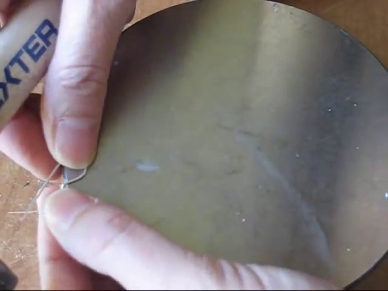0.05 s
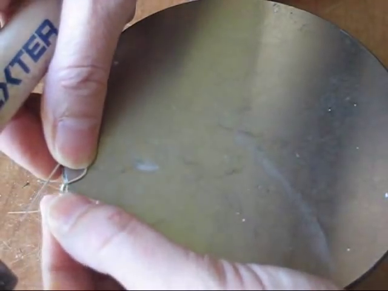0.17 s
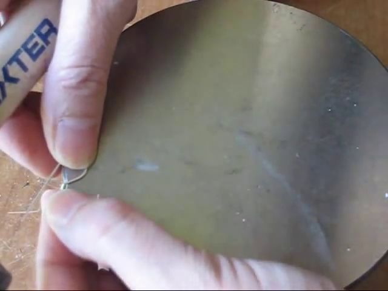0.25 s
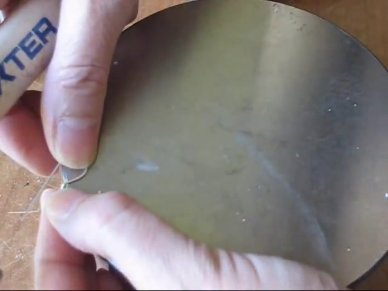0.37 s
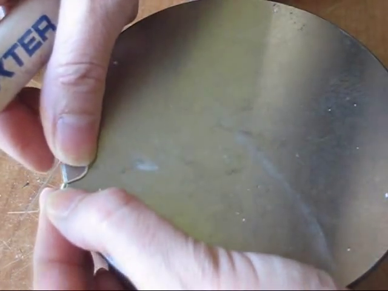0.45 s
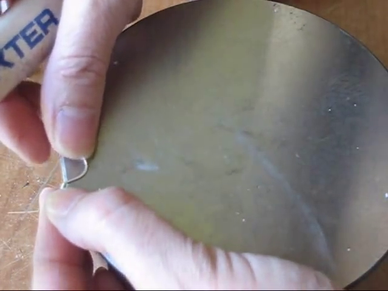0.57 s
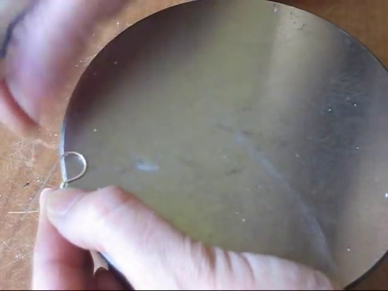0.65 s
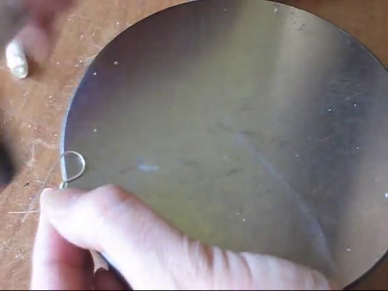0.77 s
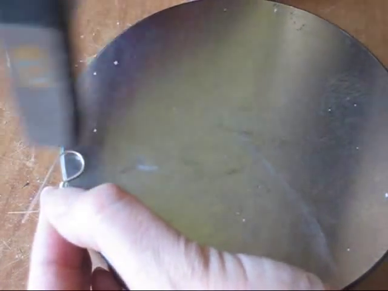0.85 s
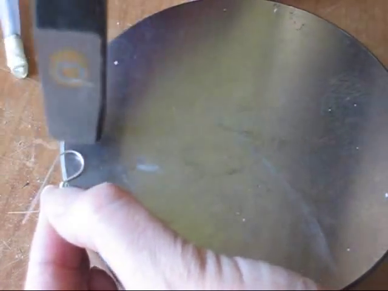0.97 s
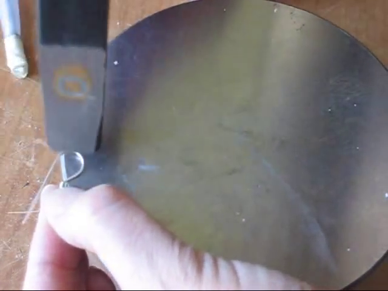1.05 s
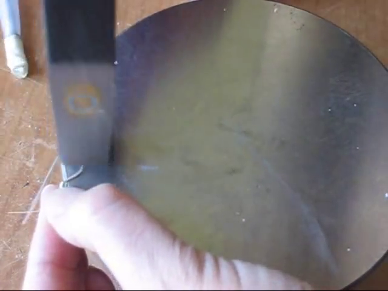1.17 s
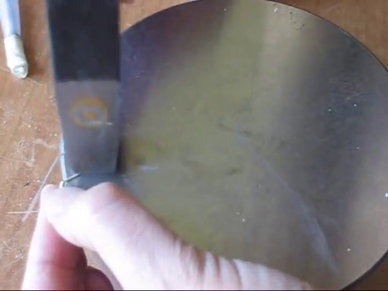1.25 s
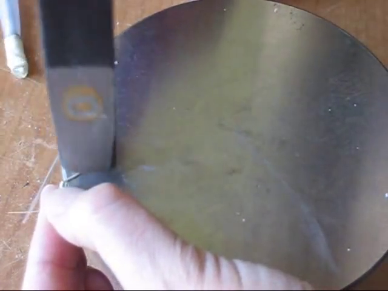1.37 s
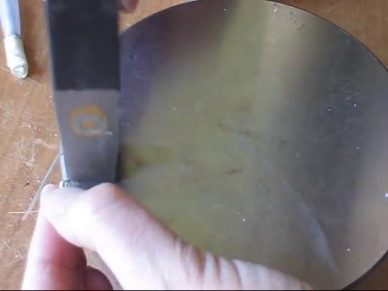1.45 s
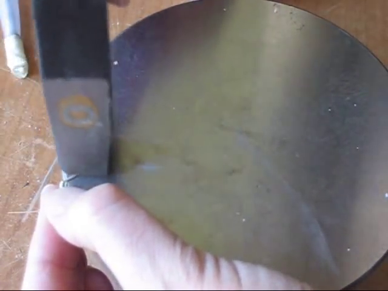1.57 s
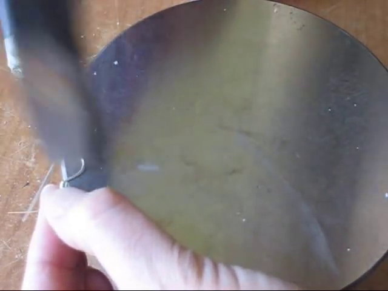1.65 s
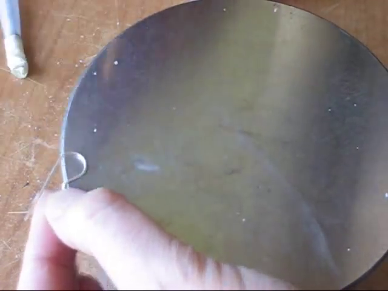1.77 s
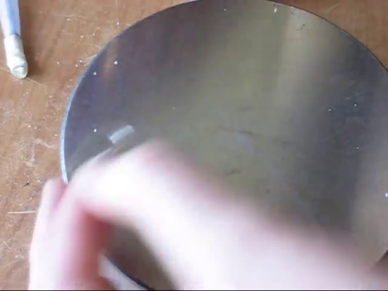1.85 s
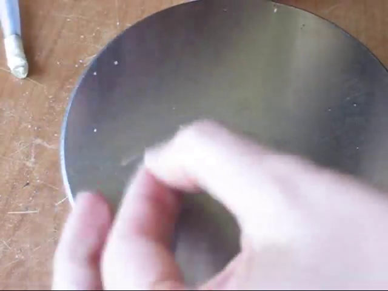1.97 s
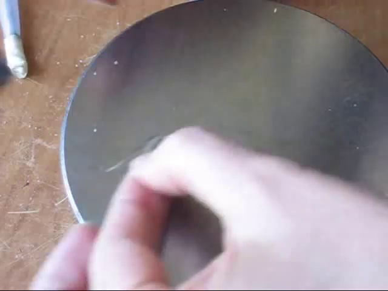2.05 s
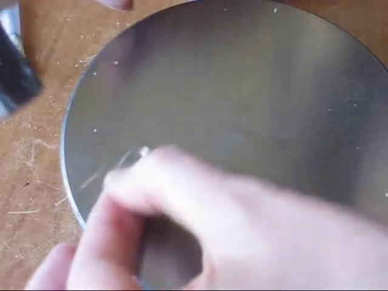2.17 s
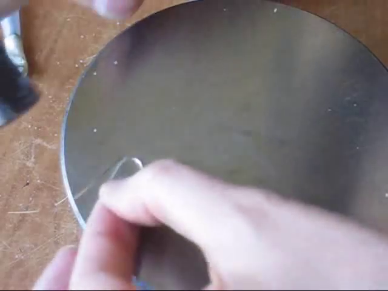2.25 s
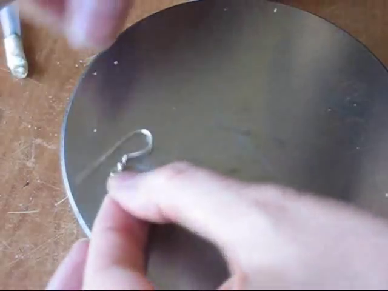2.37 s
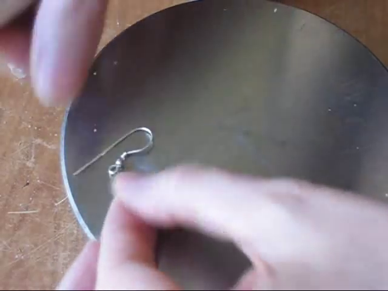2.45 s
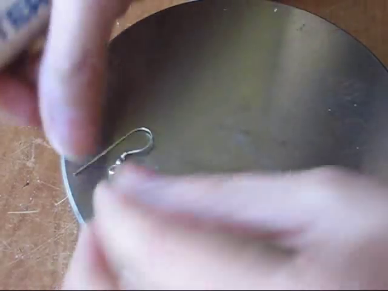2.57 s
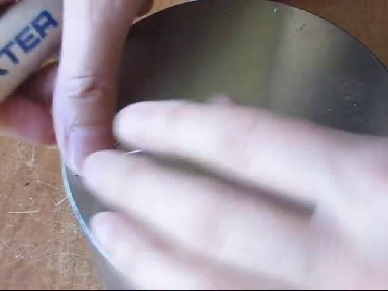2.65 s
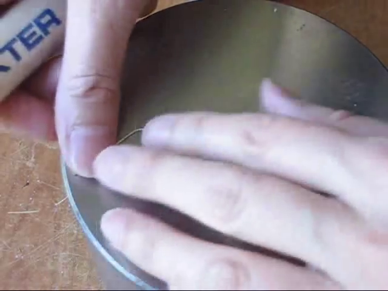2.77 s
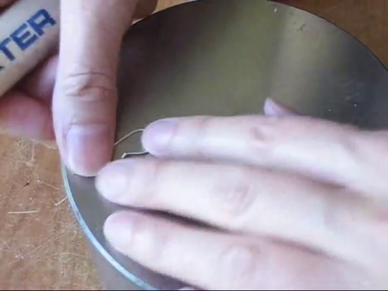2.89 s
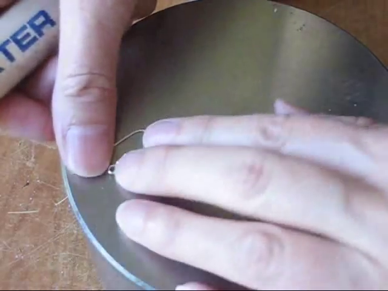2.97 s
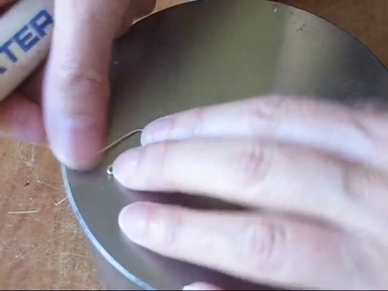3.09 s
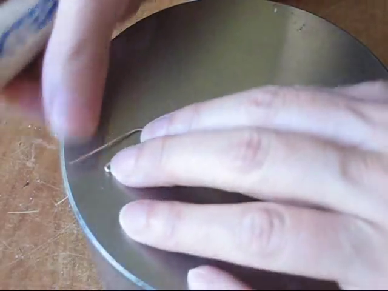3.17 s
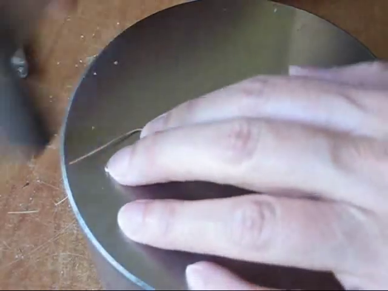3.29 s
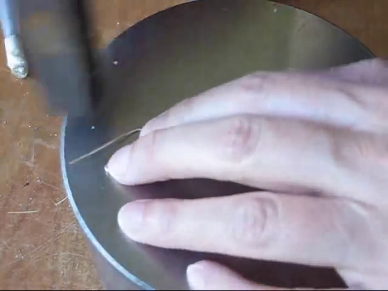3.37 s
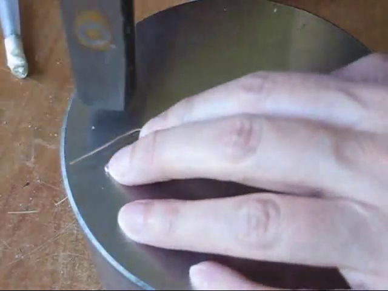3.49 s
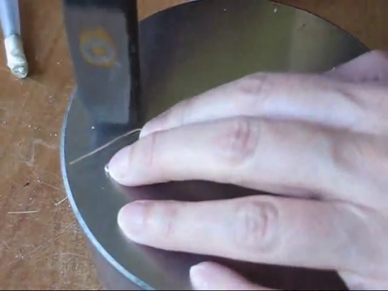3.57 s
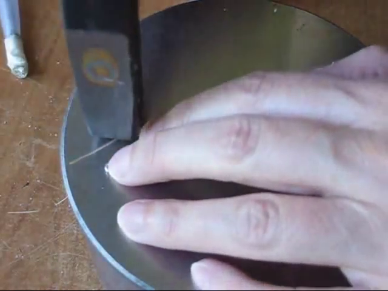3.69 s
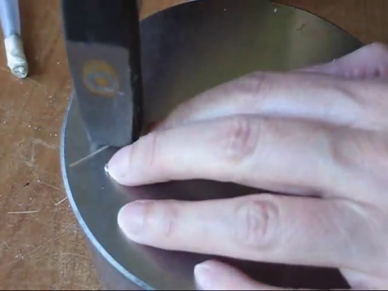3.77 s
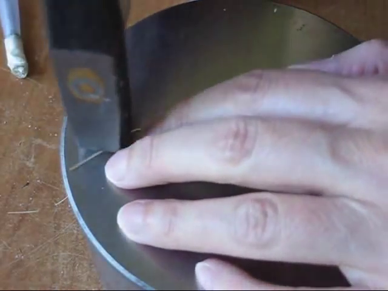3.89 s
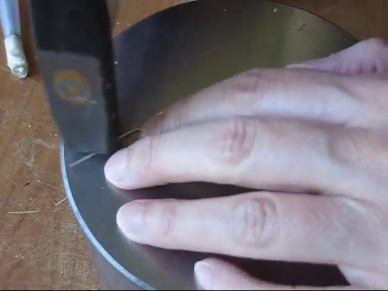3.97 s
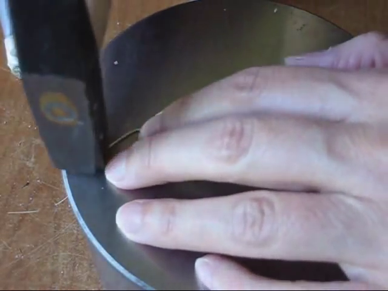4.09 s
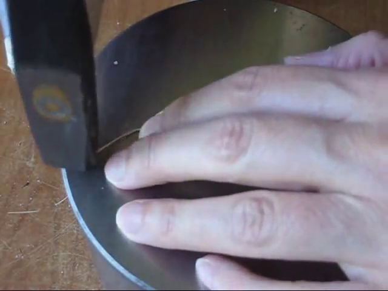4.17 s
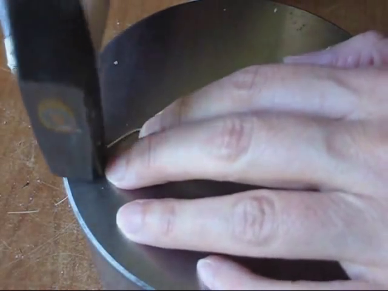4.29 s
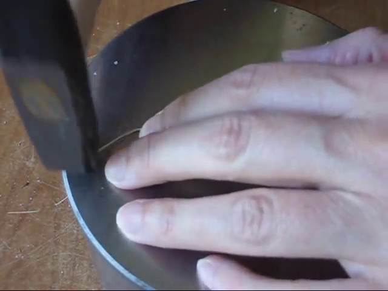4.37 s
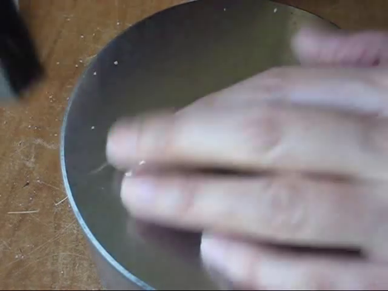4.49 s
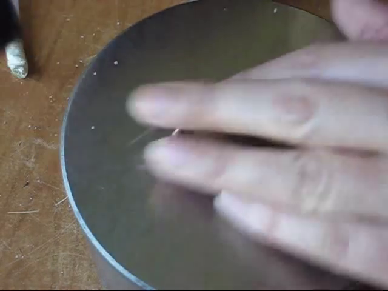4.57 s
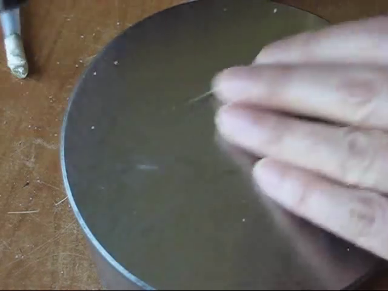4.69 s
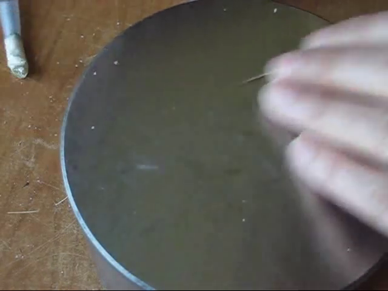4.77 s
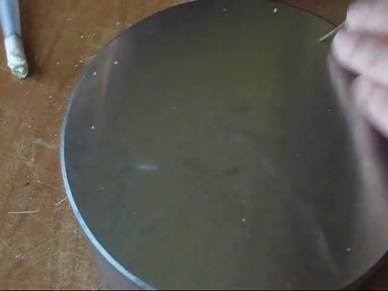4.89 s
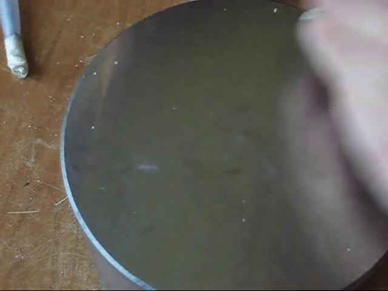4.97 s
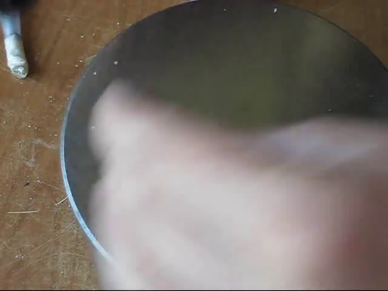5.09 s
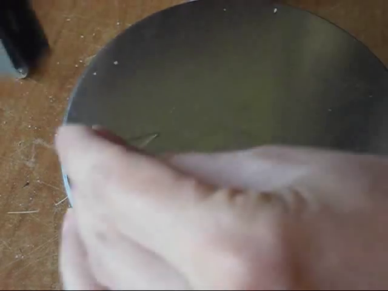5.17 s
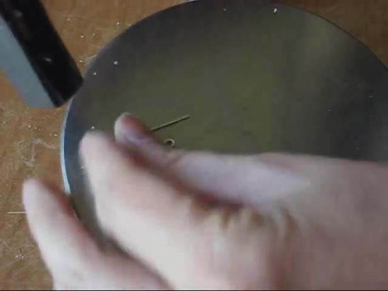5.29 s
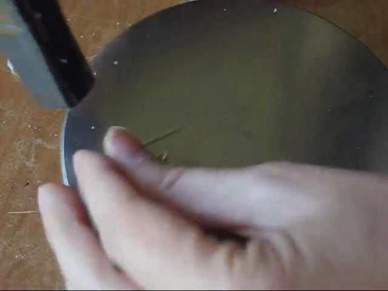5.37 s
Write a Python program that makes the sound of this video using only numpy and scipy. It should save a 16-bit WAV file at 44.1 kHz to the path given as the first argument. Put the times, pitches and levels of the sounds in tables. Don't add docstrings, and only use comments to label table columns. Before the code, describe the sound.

Close, crude-sounding capture of bench work: a soft tick as the wire is handled, three dry steel taps with doubled bounces, quiet handling, then a brighter tap, two duller ones and a strong final rap with a faint rattle. The table thuds underneath and the small room answers briefly. Grainy hiss and high camera whine dip after blows and creep back; far traffic hums low. Small ticks end it.

```python
import sys
import numpy as np
from scipy import signal
from scipy.fft import rfft, irfft, next_fast_len
from scipy.io import wavfile
from scipy.ndimage import map_coordinates

SR = 44100
rng = np.random.default_rng(int(sys.argv[2]) if len(sys.argv) > 2 else 0)


def volts_from_db(level):
    exponent = np.asarray(level, float) / 20
    return 10 ** exponent


def waveform_to_disk(signal):
    frames = np.transpose(np.atleast_2d(signal))
    scaled = np.clip(frames, -1, 1) * 32767
    samples = np.round(scaled).astype(np.int16)
    wavfile.write(sys.argv[1], SR, samples)


N = 239683

# (time [s], click level [dB], bright ring re click [dB], table thud re click [dB])
BLOWS = [(1.2742, -4, -22, -10.5), (1.304, -19, -22, -4), (1.4916, -2, -19.5, -13), (1.4995, -19, -11, -11),
         (1.639, -6.5, -18, -8.5), (1.6486, -14.5, -16, -17.5), (3.6797, -4.5, -1, -20),
         (3.8287, -19.5, -22, -3), (4.1418, -15.5, -18, 1), (4.346, -0.5, -12, -14), (4.358, -27, -20, -21)]
THUD_PIVOT_DB = -6


def unit(x):
    return x / np.sqrt(np.mean(x ** 2) + 1e-20)


def along(points, hz):
    f, v = np.transpose(points)
    return np.interp(np.log(hz + 1), np.log(f + 1), v)


def noise(gain):
    m = next_fast_len(N)
    spectrum = rfft(rng.standard_normal(m)) * gain(np.fft.rfftfreq(m, 1 / SR))
    return unit(irfft(spectrum, m)[:N])


def wobble(rate):
    knots = rng.standard_normal(int(N * rate / SR) + 4)
    return map_coordinates(knots, [np.arange(N) * rate / SR])


def swell(s, length, db):
    t = np.arange(N) / SR - s
    ramp_s = 0.14
    return volts_from_db(db) * np.clip(np.minimum(t, length - t) / ramp_s, 0, 1)


def ring(t, hz, db, t60, attack):
    t = np.maximum(t, 0)
    decay = volts_from_db(db - 60 * t / t60)
    return -decay * (1 - np.exp(-t / attack)) * np.sin(2 * np.pi * hz * t)


def add(track, s, sound):
    track[round(s * SR):][:len(sound)] += sound


def camera_whine():
    # (nearest line [Hz], tone below it by [Hz], rms level [dB])
    whine_lines = [(2775, 11.9, -53), (3176.3, 14.2, -56.3)]
    pictures_per_s = 30
    t = np.arange(N) / SR
    since = t % (1 / pictures_per_s)
    return sum(np.sqrt(2) * volts_from_db(db) * np.sin(2 * np.pi * (hz * t - below_hz * since))
               for hz, below_hz, db in whine_lines)


def hiss():
    # (frequency [Hz], spectral density [dB per Hz])
    hiss_curve = [(20, -6.5), (60, 3.5), (200, 1.5), (600, -4), (1500, -7.5), (2600, -6), (3600, -8.5),
                  (5000, -8.5), (6500, -11), (9000, -57), (22050, -120)]
    return volts_from_db(-50.5) * noise(lambda f: volts_from_db(along(hiss_curve, f)))


def engine():
    # (time [s], length [s], first order level [dB], second order level [dB])
    surges = [
        (0.247, 0.99, -54.5, -65),
        (2.31, 0.7, -63.5, -60),
        (2.897, 0.67, -62.5, -68.5),
    ]
    idle_db, cruise_hz, short_hz, settle_s = -66, 105.5, 18, 1.4
    t = np.arange(N) / SR
    firing_hz = cruise_hz - short_hz * np.exp(-t / settle_s)
    first = volts_from_db(idle_db) + sum(swell(s, length, db) for s, length, db, _ in surges)
    second = volts_from_db(idle_db) + sum(swell(s, length, db) for s, length, _, db in surges)
    turn = 2 * np.pi * np.cumsum(firing_hz * (1 + .008 * wobble(9))) / SR
    first_order = first * volts_from_db(1.7 * wobble(8)) * np.sin(turn)
    second_order = second * volts_from_db(2.5 * wobble(8.8)) * np.sin(2 * turn)
    return first_order + second_order


def traffic():
    # (time [s], length [s], level [dB])
    passing = [
        (0.444, .3, -60.5),
        (2.672, .65, -57),
        (5.166, .4, -53),
    ]
    drone_hz, deep_db = 63.04, -63.5
    turn = 2 * np.pi * np.cumsum(drone_hz * (1 + .04 * wobble(4))) / SR
    drone = volts_from_db(3.5 + wobble(6)) * np.sin(turn)
    deep = volts_from_db(deep_db) * noise(lambda f: 1 / (1 + ((f - drone_hz) / 12) ** 4))
    return sum(swell(*row) for row in passing) * drone + deep


def gain_db():
    rest_db, start_dip_db, recover_s = 3, 7.5, 1.3
    knee_db, dip_slope = -31, .6
    t = np.arange(N) / SR
    dips = [(0, start_dip_db)]
    dips += [(s, dip_slope * (db + thud_db - knee_db)) for s, db, _, thud_db in BLOWS]
    curves = [dip * np.exp(-np.abs(t - s) / recover_s) * (t >= s) for s, dip in dips]
    return rest_db - np.max(curves, axis=0)


def background():
    return volts_from_db(gain_db()) * (camera_whine() + hiss() + engine() + traffic())


def room(x, colour, delay, seconds):
    # (frequency [Hz], t60 [s])
    room_decay = [(100, .5), (500, 0.73), (1500, 0.54), (3300, .5), (5500, 0.43)]
    hz, t, z = signal.stft(rng.standard_normal(SR // 2), SR, nperseg=256)
    fall = along(colour, hz)[:, None] - 60 * t / (seconds * along(room_decay, hz)[:, None])
    tail = signal.istft(z * volts_from_db(fall), SR, nperseg=256)[1]
    tail = tail * (1 - np.exp(-np.arange(len(tail)) / (0.069 * delay * SR)))
    tail = np.pad(tail / np.linalg.norm(tail), (round(delay * SR), 0))
    return signal.fftconvolve(x, tail)[:N]


def boom(thuds):
    # (frequency [Hz], density [dB per Hz])
    wood_air = [(60, -46), (130, -17), (200, -8.5), (300, -2), (480, -11.5), (650, -12), (1000, -20),
                (1500, -15.5), (3000, -47.5)]
    return volts_from_db(13.5) * room(thuds, wood_air, .006, 0.76)


def walls(blows, rings):
    # (frequency [Hz], density [dB per Hz])
    steel_air = [(300, -31.5), (800, -12), (1500, -11.5), (1800, -8), (2500, -12), (2900, -3.5), (3300, -4),
                 (3700, -11.5), (4500, -14), (5200, -10), (6000, -20), (7000, -51)]
    return volts_from_db(4.0) * room(blows, steel_air, 0.011, 1.4) + volts_from_db(-18.0) * room(rings, [(1, 0)], 0.023, 1.4)


def clutter(blows):
    # (frequency [Hz], density [dB per Hz])
    clutter_air = [(300, -21.5), (900, -5.5), (2500, -9), (3200, 0), (4000, -14.5), (5500, -7), (7000, -27)]
    return volts_from_db(10.5) * room(blows, clutter_air, 0.000987, 0.071)


def table():
    # (frequency [Hz], level [dB], t60 [s], side of swing [+1 or -1])
    board_modes = [(64.2, -3.0, 0.42, -1), (70.7, -10.0, 0.4, 1), (117.0, -19.0, 0.65, 1),
                   (138.9, 5.0, 0.2, 1), (161.1, -6.0, 0.57, 1), (183.9, 2.0, 0.295, 1),
                   (193.8, 4.0, 0.239, 1), (196.6, 3.0, 0.161, -1), (212.2, -7.0, 0.631, 1),
                   (222.0, -10.0, 0.565, 1), (233.9, -10.0, 0.65, 1), (249.7, 2.0, 0.052, 1),
                   (277.5, -7.0, 0.65, 1), (289.9, -13.0, 0.65, -1), (335.3, -3.5, 0.063, -1),
                 (366.5, -10.5, 0.415, -1), (402.8, -2.0, 0.072, -1), (429.7, -10.0, 0.303, 1),
                 (445.1, -5.5, 0.325, 1), (471.1, 1.0, 0.084, 1), (560, -10.0, 0.12, -1),
                 (646.2, -16.0, 0.372, -1), (708.9, -6.0, 0.101, 1)]
    modes = board_modes
    tilt, tilt_hz, tilt_floor_db = 0.23, 199, -12.5
    boom_lags = .3
    wood, thuds, t = np.zeros(N + SR), np.zeros(N), np.arange(SR // 2) / SR
    scatter_db = rng.normal(0, 1.1, (len(BLOWS), len(modes)))
    for (s, db, _, thud_db), vary_db in zip(BLOWS, scatter_db):
        slope = tilt * (max(thud_db, tilt_floor_db) - THUD_PIVOT_DB)
        board = 0
        for (hz, level, t60, side), v in zip(modes, vary_db):
            mode_db = level + v + slope * np.log2(tilt_hz / hz)
            board = board + side * ring(t - .00163, hz, mode_db, t60, .0004)
        push = -ring(t - .0005, 347, 27.4, 0.0027, 0.00044)
        add(wood, s, volts_from_db(db + thud_db - 11.5) * (board + push))
        thuds[round(s * SR)] = volts_from_db(db + thud_db - boom_lags * (thud_db - THUD_PIVOT_DB))
    return wood[:N], thuds


def finger_ticks():
    # (time [s], frequency [Hz], level [dB])
    nudges = [
        (.76, 3340, -35),
        (2.036, 109, -42),
        (3.25, 4630, -39),
        (3.256, 3010, -37),
        (5.184, 5130, -37),
        (5.225, 4770, -37.5),
        (5.2705, 4500, -37.5),
        (5.319, 4740, -35),
    ]
    track, t = np.zeros(N + SR), np.arange(SR // 5) / SR
    for s, hz, db in nudges:
        add(track, s, ring(t, hz, db, .015 + 4.5 / hz, 0.00076))
    return track[:N]


def block_singing():
    # (time [s], level [dB])
    songs = [
        (3.69, -37),
        (3.835, -41),
        (4.36, -34),
    ]
    track, t = np.zeros(N + SR), np.arange(SR // 2) / SR
    for s, db in songs:
        add(track, s, ring(t, 3324, db, .4, .012))
    return track[:N]


def wire():
    # (time [s], mode name, level [dB])
    wire_rings = [
        (1.503, "mid", -22.5),
        (3.68, "low", -21),
        (4.349, "high", -29),
        (4.349, "top", -29.5),
        (1.498, "top", -38),
        (4.358, "mid", -30),
        (4.375, "mid", -29),
    ]
    wire_modes = {"low": (1190, .065), "mid": (2815, .05), "high": (4974, .08), "top": (5195, .2)}
    track, t = np.zeros(N + SR), np.arange(SR // 5) / SR
    for s, mode, db in wire_rings:
        hz, t60 = wire_modes[mode]
        add(track, s, ring(t, hz, db, t60, 0.00069))
    return track[:N]


def hammer():
    # (frequency [Hz], level [dB], t60 [s], signed side of swing)
    face_modes = [(1485, -6, 0.0078, -0.35), (2480, 10, 0.0029, 0.31), (4536, -20.5, 0.019, 0.29),
                  (1061, -22.5, 0.011, 0.74), (1724, -20, 0.015, -0.45)]
    block_hz, block_t60, block_lag_s = 3246, .0175, .00027
    base_db, block_lags = -11, 0.31
    rim_db, rim_until_s = -1, 2.5
    bounce_s, bounce_dull_db = .04, -2.5
    face, rings, blows = np.zeros(N + SR), np.zeros(N + SR), np.zeros(N)
    t = np.arange(SR // 5) / SR
    gaps = np.diff([0] + [row[0] for row in BLOWS])
    for (s, db, bright_db, _), chance, gap in zip(BLOWS, rng.standard_normal(len(BLOWS)), gaps):
        click = sum(side * ring(t, hz, level + 14.0, t60, .00035) for hz, level, t60, side in face_modes)
        click = volts_from_db(db + bounce_dull_db * (gap < bounce_s)) * click
        add(face, s - .00015, click)
        add(face, s - .002, volts_from_db(-26) * click)

        bright_hz = 5204 * (1 + .03 * np.tanh(chance))
        bright = volts_from_db(db) * ring(t - .0005, bright_hz, bright_db + 14.0, 0.0071, 0.0011)
        crack = volts_from_db(db) * ring(t - 0.001185, 4500, .5 * bright_db - 6.5 + 14.0, 0.0013, .0001)
        add(face, s, 0.44 * bright + crack)

        block_db = base_db - block_lags * db + rim_db * (s < rim_until_s)
        block = volts_from_db(db) * ring(t - block_lag_s, block_hz, block_db + 9.5, block_t60, 0.0005)
        add(rings, s, 0.53 * bright - block)
        blows[round(s * SR)] = volts_from_db(db + 0.37 * block_db)
    return face[:N], rings[:N], blows


def scene():
    face, rings, blows = hammer()
    wood, thuds = table()
    steel = face + rings + wire() + finger_ticks() + block_singing()
    echoes = clutter(blows) + walls(blows, rings) + boom(thuds)
    return (steel + wood + echoes + background())[None]


def low_pass(x):
    return signal.sosfilt(signal.butter(12, 16230, fs=SR, output="sos"), x)


def record(dry):
    step, hold = 1 / 128, 4
    smooth = signal.sosfilt(signal.butter(4, 6300, fs=SR, output="sos"), dry)
    codes = np.clip(np.round((smooth[:, 2::hold] - .0065) / step), -128, 127)
    held = np.repeat(codes * step, hold, axis=1)
    held = np.pad(held, ((0, 0), (1, hold)), "edge")[:, :N]
    hz = np.fft.rfftfreq(N, 1 / SR)
    top_cut = volts_from_db(-38 * np.clip((hz - 15450) / 150, 0, 1))
    held = irfft(rfft(held) * top_cut, N)
    return low_pass(held)


dry = scene()
out = record(dry)
waveform_to_disk(out)
```